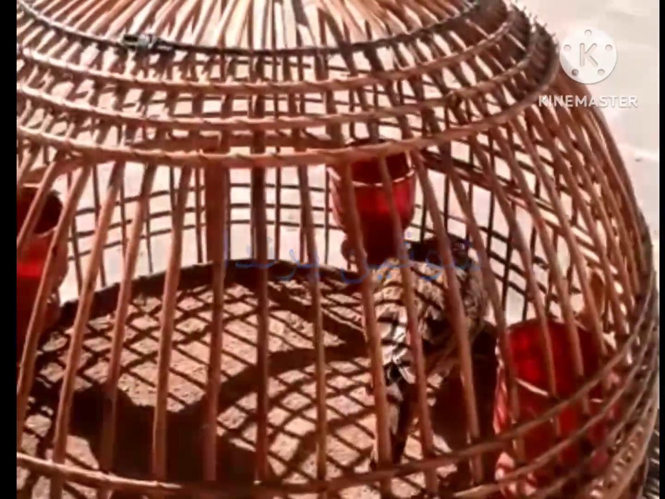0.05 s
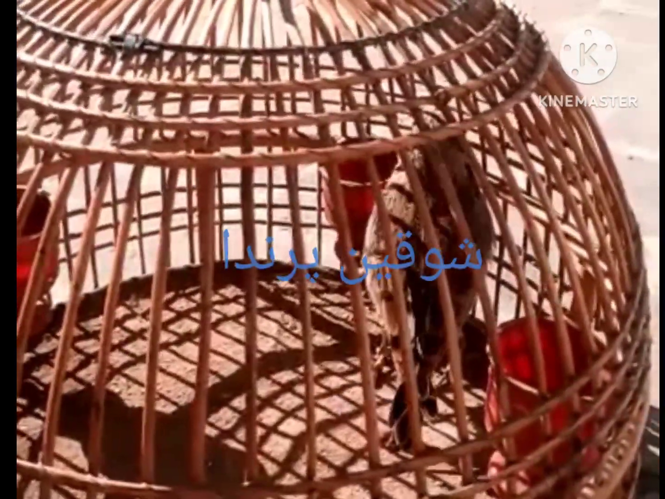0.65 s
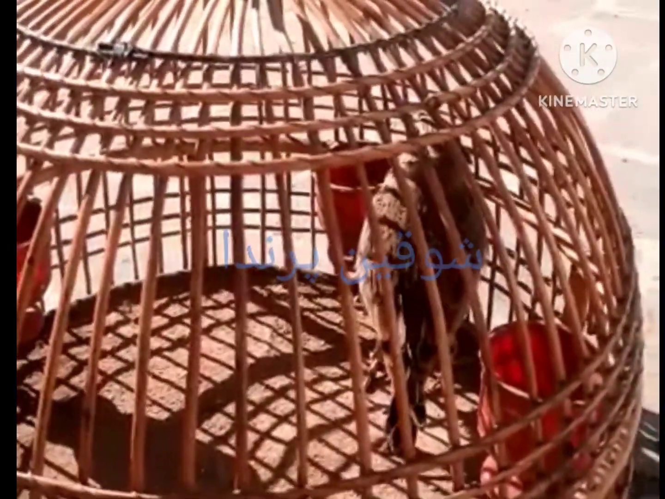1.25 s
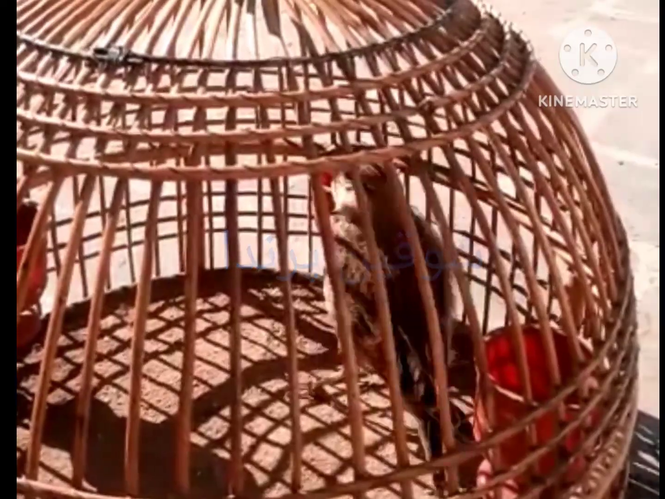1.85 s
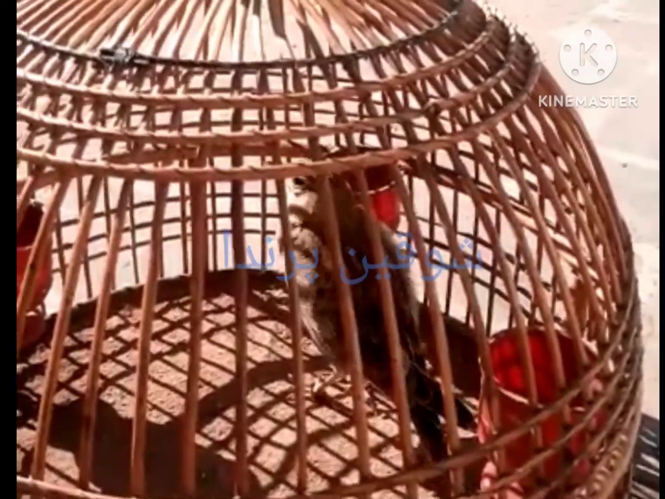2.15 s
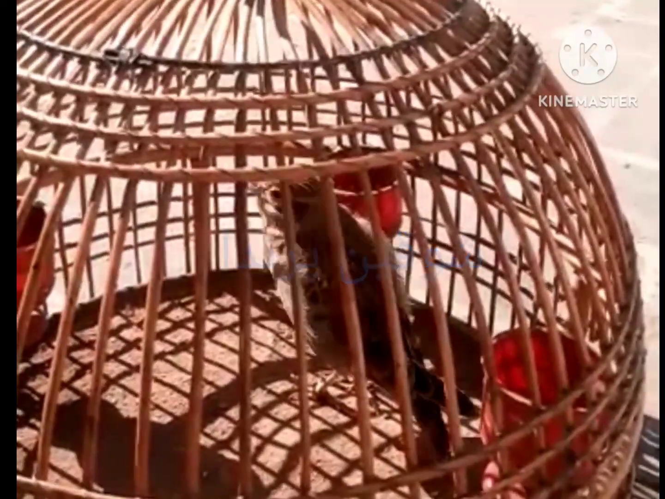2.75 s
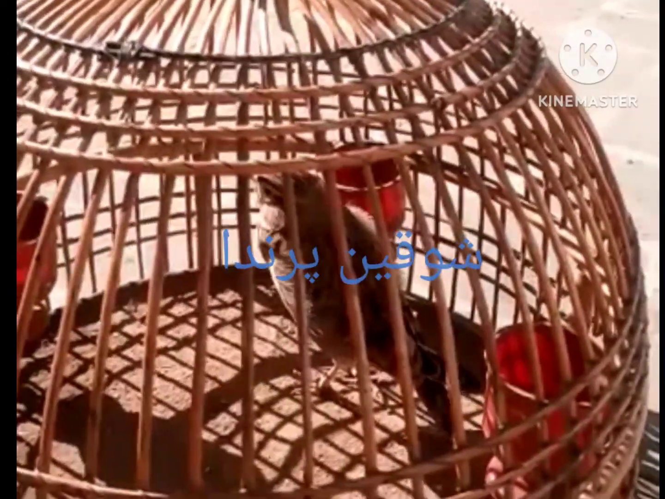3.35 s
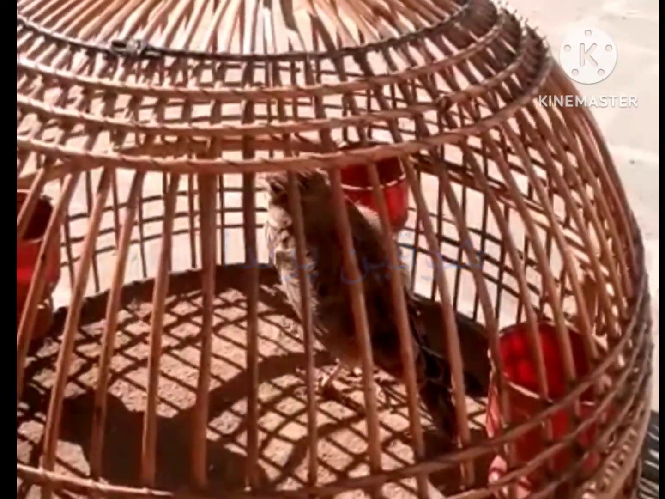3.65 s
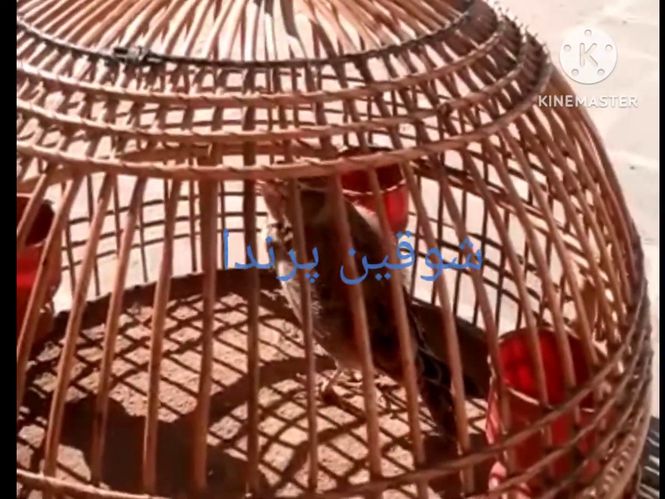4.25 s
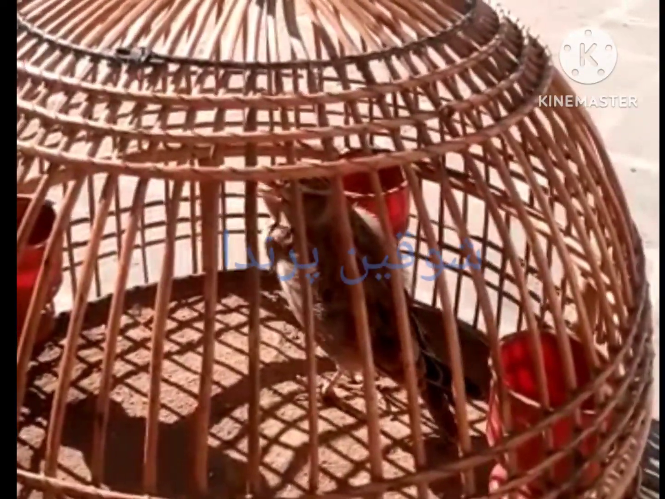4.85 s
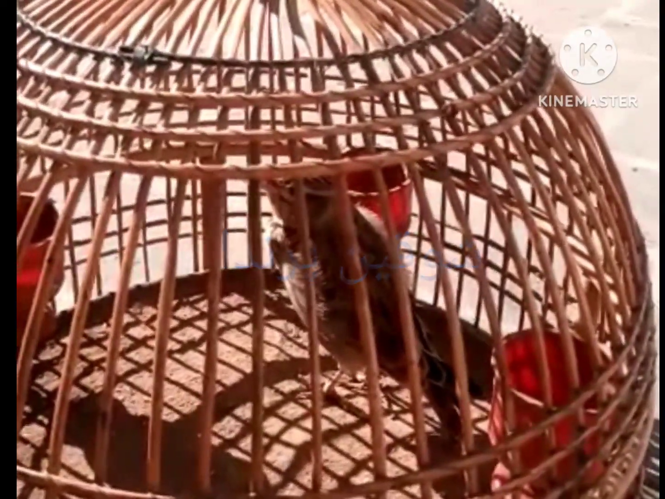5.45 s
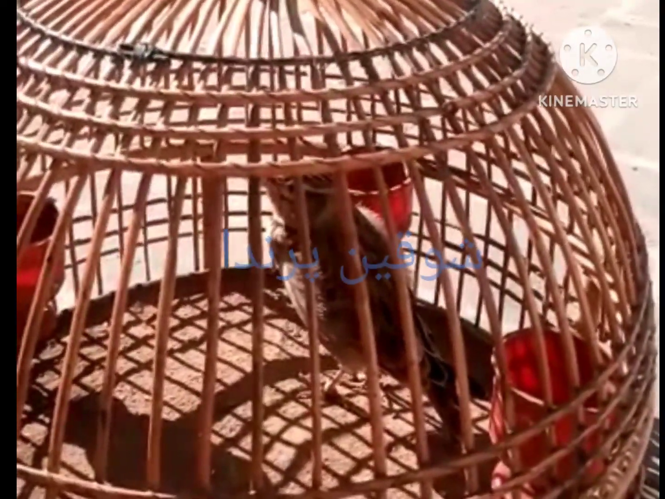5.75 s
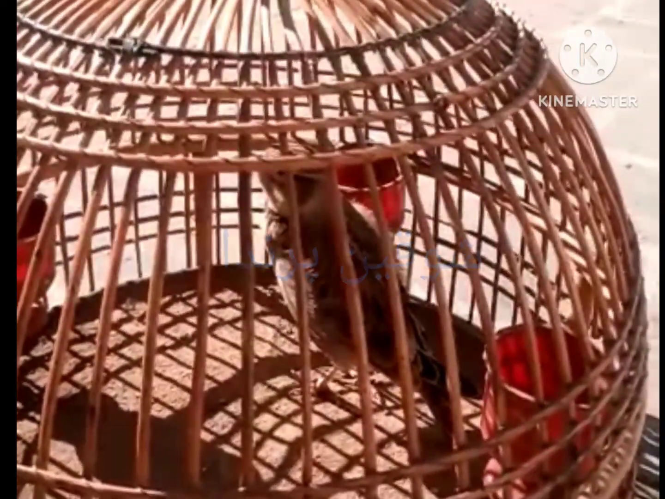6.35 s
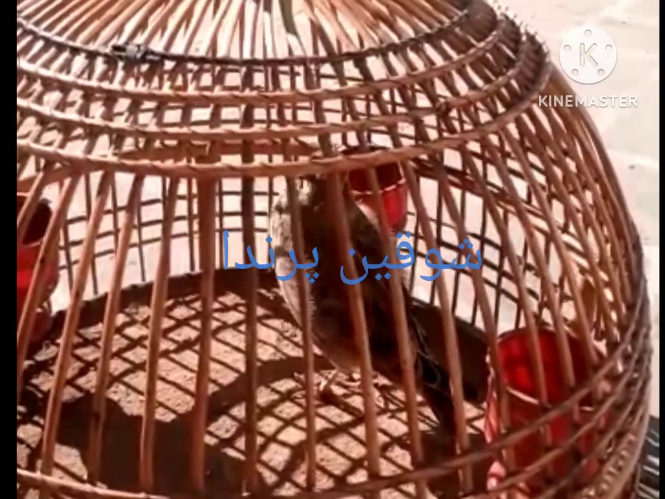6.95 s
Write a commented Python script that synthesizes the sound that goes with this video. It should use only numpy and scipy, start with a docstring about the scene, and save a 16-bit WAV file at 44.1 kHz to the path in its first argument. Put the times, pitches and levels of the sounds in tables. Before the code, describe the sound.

A lark sings close by in a wicker cage, its bright, slightly raspy notes echoing briefly off the hard walls of a yard. A faint town hum lies underneath throughout. At about 0.5 seconds come four high quavering whistles with tiny beak ticks. From 1.4 seconds the bird repeats quick looping slurs that dip and rise, then gives a few plain falling notes at 2.8 and two soft peeps. A fast warble at 3.4 seconds leads into a loud run of about eleven falling notes, from 3.6 to 5 seconds, and three stuttering notes follow. The lark pauses from about 5.4 seconds, and a distant bird calls faintly between 5.7 and 6.7. At around 7 seconds the lark returns with a few short, level whistles.

```python
"""A lark sings in a wicker cage in a hard-walled yard, over a faint town hum. Quavering whistles (0.5 s),
looping slurs (1.4 s), plain falls and two peeps (2.8 s), a warble (3.4 s), falling cascades (3.6 s),
stutters (5.0 s). A far bird calls in the pause (5.7 s); level whistles close (7.0 s).
The syrinx is a gliding near-sine with weak overtones and rasp; floor, cage and walls return every note."""
import sys
import numpy as np
from scipy import signal
from scipy.fft import rfft, irfft, next_fast_len
from scipy.io import wavfile
from scipy.ndimage import uniform_filter1d, map_coordinates

SR = 44100
rng = np.random.default_rng(int(sys.argv[2]) if len(sys.argv) > 2 else 0)


def output_pcm(signal):
    """Save a mono or channel-first signal as 16-bit PCM at the path in sys.argv[1].

    Samples are clipped to [-1, 1] before scaling.
    """
    pcm = np.clip(np.atleast_2d(signal).T, -1, 1) * 32767
    wavfile.write(sys.argv[1], SR, np.round(pcm).astype(np.int16))


N = 317079
TIME_S = np.arange(N) / SR

TOWN_SPECTRUM = [(18, -59.5), (30, -25), (86, 4), (368, -5), (497, -4.5), (550, -3.5), (863, -9.5),
                 (2730, -13), (3600, -19.5), (3980, -14.5), (5520, -18), (12000, -42), (15600, -85),
                 (22000, -120)]  # town noise: f/Hz, relative level/dB
TOWN_HUMS = [(0, 0.43, 281, -53), (2.099, .35, 700, -55.5), (3.306, 0.56, 1225, -61),
             (4.109, 0.37, 670, -63), (6.102, 0.51, 391, -53.5)]  # distant hums: t/s, length/s, f/Hz, level/dB
FAR_BIRD_CALLS = [(5.701, 0.042, 2820, 7500, -47), (5.76, 0.078, 2190, 3190, -53),
                  (6.06, 0.084, 3240, 6080, -43.5), (6.121, 0.055, 2385, 3250, -43.5),
                  (6.13, .25, 5430, 5400, -62.5), (6.34, 0.042, 3580, 4340, -49),
                  (6.49, 0.16, 5390, 5410, -57.5)]  # far slides: t/s, length/s, low f/Hz, high f/Hz, base level/dB
REFLECTIONS = [(.0012, -28), (.0027, -10), (.0053, -10), (0.01, -14), (.0197, -4.5), (.025, -2.55),
               (.0383, -10), (.05, -14.5)]  # floor, cage and wall echoes: delay/s, gain/dB
WALL_RESPONSE = [(2500, 3), (3300, -12), (3900, -6), (4400, 0), (5500, -3.5), (7000, 1), (15000, -29.5)]  # colour of the echoes: f/Hz, gain/dB

THROAT_RESPONSE = [(4000, -13.5), (5500, -28.5), (7000, -35.5), (8500, -40), (10000, -36), (11500, -47),
                   (13000, -59.5), (15200, -27)]  # overtones leaving throat and beak: f/Hz, gain/dB
RASP_SPECTRUM = [(1000, -36.5), (2500, -20), (5500, 3), (7000, -2), (9800, -7), (12000, -26), (14000, 14.5),
                 (15500, -1.5)]  # turbulence in the syrinx: f/Hz, relative level/dB
SYRINX_PRESS = [(.5, 9), (1.15, 5.5), (1.4, -1.5), (2.52, -2.5), (2.63, 8), (2.9, 4), (3.5, -1), (3.7, 6.5),
                (7, 6)]  # pressure lifting overtones and rasp: t/s, gain/dB

# syrinx gestures: share of length/0..1, pitch in range/0..1, gain/dB
FALL_GESTURE = [(0, 0.687, -10), (.13, .93, -3), (.3, .7, 1), (.45, .45, -2), (.65, .18, -16.5),
                (1, 0.032, -13.5)]
RISE_GESTURE = [(0, 0.042, -20.5), (.35, 0.21, -17.5), (.54, .5, -1), (.86, .873, -3), (1, .92, -7.5)]
SLIDE_GESTURE = [(0, 0.94, 0), (.12, .8, -2.5), (.35, .42, 0.5), (1, 0.041, -5)]
FLICK_GESTURE = [(0, 1, 1), (.5, .85, 0), (.78, 0.17, 1.5), (1, 0.04, -12)]
HOLD_GESTURE = [(0, 0.82, 0), (.12, 0.92, 1.5), (.85, .7, -0.5), (1, 0.026, -0.5)]

BEAK_TICKS = [(.715, -36), (.877, -32), (1.093, -37), (6.984, -38)]  # ticks at note onsets: t/s, level/dB
# level whistles: t/s, length/s, low f/Hz, high f/Hz, base level/dB
HELD_NOTES = [(.497, 0.01, 4200, 4820, -36.5), (0.701, 0.009, 4420, 4760, -29),
              (6.986, 0.057, 4110, 4746, -29.5), (7.04, 0.031, 3120, 4765, -23.5),
              (7.071, .082, 3560, 4343, -20), (7.164, .051, 4400, 4765, -18)]
# quavering whistles: t/s, length/s, top f/Hz, dip/Hz, first level/dB, last level/dB
QUAVER_NOTES = [(0.514, 0.12, 4757, 458, -22.5, -17), (.718, .088, 5078, 614, -20, -17),
                (.893, 0.092, 4950, 857, -20.5, -14.5), (1.094, 0.079, 4916, 501, -25.5, -10.5)]
# looping slurs: t/s, length/s, low f/Hz, fall level/dB, rise level/dB
LOOP_NOTES = [(1.377, .09, 2010, -20, -16.5), (1.521, 0.091, 2110, -21, -14.5),
              (1.659, 0.079, 2110, -18, -16), (1.778, 0.07, 1912, -27, -16),
              (1.901, 0.053, 1968, -17, -20.5), (2.011, 0.059, 1830, -24, -18.5),
              (2.123, .066, 2107, -18.5, -14), (2.244, .089, 2366, -17, -12.5),
              (2.389, 0.094, 2180, -15, -11), (2.526, 0.11, 2165, -16.5, -15.5),
              (2.674, .108, 2160, -16.5, -13.5)]
# plain falls, the first in two voices: t/s, high f/Hz, low f/Hz, base level/dB
DROP_NOTES = [(2.845, 2650, 1710, -31), (2.849, 4986, 3350, -38.5), (2.919, 4100, 1720, -21.5),
              (3.006, 4194, 1720, -22), (3.089, 4120, 1720, -24)]
PEEP_NOTES = [(3.184, 0.031), (3.328, 0.058)]  # soft rising peeps: t/s, length/s
CASCADE_NOTES = [(3.628, .054, 4720), (3.72, .063, 5330), (3.836, 0.068, 5500), (3.969, 0.072, 5276),
                 (4.104, .071, 5490), (4.225, 0.076, 5540), (4.353, 0.074, 5690), (4.487, .073, 5570),
                 (4.618, 0.079, 5710), (4.75, 0.082, 5875), (4.885, 0.074, 6090)]  # falling run: t/s, length/s, top f/Hz
STUTTER_NOTES = [(5.017, 0.051, -21), (5.157, 0.043, -21.5), (5.296, .046, -25)]  # slides ending in flicks: t/s, time to first flick/s, base level/dB


def undb(db):
    """Decibels to gain."""
    return 10 ** (np.asarray(db) / 20)


def spectrum_at(points, hz):
    """Gain of an (f/Hz, level/dB) curve at hz."""
    f, db = np.transpose(points)
    return undb(np.interp(np.log(hz + 1), np.log(f), db))


def shaped(x, points):
    """Filter by an (f/Hz, level/dB) curve."""
    size = len(x)
    return irfft(rfft(x) * spectrum_at(points, np.arange(size // 2 + 1) * SR / size), size)


def unit(x):
    """Scale to rms 1."""
    return x / np.sqrt(np.mean(x ** 2))


def coloured(points, count):
    """Noise of a given spectrum, rms 1."""
    return unit(shaped(rng.standard_normal(next_fast_len(count)), points)[:count])


def band(x, lo_hz, hi_hz):
    """Gentle band-pass."""
    sos = signal.butter(2, [lo_hz, min(hi_hz, .45 * SR)], "band", fs=SR, output="sos")
    return signal.sosfilt(sos, x)


def walk(count, rate_hz):
    """Smooth random drift, spread near 1."""
    place = np.arange(count) / SR * rate_hz
    return map_coordinates(rng.standard_normal(4096), [place], order=3, mode="wrap")


def add(track, start_s, sound):
    """Mix a sound in at start_s."""
    i = int(start_s * SR)
    part = sound[:max(N - i, 0)]
    track[i:i + len(part)] += part


def town(mid_band_db=-49.5, waver_db=1.84):
    """Distant hum and hiss; narrow hums come and go."""
    noise = coloured(TOWN_SPECTRUM, N)
    out = noise / np.std(band(noise, 100, 1000)) * undb(mid_band_db + waver_db * walk(N, 7.2))
    for start_s, length_s, hz, db in TOWN_HUMS:
        count = int(length_s * SR)
        hum = unit(band(rng.standard_normal(count), hz - 20, hz + 20))
        add(out, start_s, hum * signal.windows.tukey(count, .5) * undb(db))
    return out


def far_bird():
    """Faint slides and near-level notes from a second syrinx."""
    return notes(SLIDE_GESTURE, FAR_BIRD_CALLS, wander=.0038, rough=.007,
                 slope_db=-6, rasp_db=-25, flutter_db=1.5)


def yard(x, scatter_db=-12, scatter_t60_s=.24, tail_db=-16, tail_t60_s=.54, wall_delay_s=.023):
    """Quick scatter off wicker and ground, then a diffuse tail from the walls."""
    t = TIME_S[:SR]
    scatter = rng.standard_normal(SR) * undb(-60 * t / scatter_t60_s)
    tail = rng.standard_normal(SR) * undb(-60 * t / tail_t60_s) * (t > wall_delay_s)
    response = undb(scatter_db) * unit(scatter) + undb(tail_db) * unit(band(tail, 300, 8000))
    return signal.fftconvolve(x, response / np.sqrt(SR))[:N]


def echoes(x, blur_s=.001, blur_db=-3, ring_hz=3900, ring_t60_s=.19, ring_db=-13):
    """Single reflections smeared by uneven surfaces, plus a short ring between the cage bars."""
    bounces = np.zeros(SR // 4)
    for delay_s, db in REFLECTIONS:
        smear = rng.standard_normal(256) * np.exp(-TIME_S[:256] / blur_s)
        bounce = undb(blur_db) * smear / np.linalg.norm(smear)
        bounce[0] += .75  # specular part
        add(bounces, delay_s, undb(db) * bounce)
    t = TIME_S[:SR // 8]
    fade = undb(-60 * t / ring_t60_s)
    ring = 2 * fade / fade.sum() * np.sin(2 * np.pi * ring_hz * t)
    response = shaped(bounces, WALL_RESPONSE)[:len(t)] + undb(ring_db) * ring
    return signal.fftconvolve(x, response)[:N]


def ticks(decay_s=.0023):
    """Tiny beak ticks: decaying noise bursts."""
    out, t = np.zeros(N), TIME_S[:512]
    for start_s, db in BEAK_TICKS:
        burst = unit(band(rng.standard_normal(len(t)), 2950, 3340))
        add(out, start_s, undb(db) * burst * np.exp(-t / decay_s))
    return out


def syrinx(start_s, hz, db, rough, slope_db, rasp_db, half_db=-55, flutter_db=3,
           full_effort_db=-12, tension_db_per_oct=7, edge_s=.0015):
    """One unsteady sine. Overtones and rasp grow with effort; alternating cycles add half harmonics."""
    count = len(hz)
    t = TIME_S[:count]
    hz = hz * (1 + rough * walk(count, 1114))
    phase = 2 * np.pi * np.cumsum(hz) / SR
    tone = np.sin(phase) + undb(half_db) * (np.sin(phase / 2) + np.sin(1.5 * phase))
    rasp = band(coloured(RASP_SPECTRUM, count), hz.min(), 2.33 * hz.mean())
    upper = undb(rasp_db + 2 * walk(count, 260)) * rasp
    for k in range(2, 6):
        gain = spectrum_at(THROAT_RESPONSE, k * hz) * undb(slope_db * (k - 2.5) + 2.2 * walk(count, 710))
        upper += gain * (k * hz < SR / 2) * np.sin(k * phase)
    press_db = np.interp(start_s + t, *np.transpose(SYRINX_PRESS)) + .25 * (np.max(db) - full_effort_db)
    press_db += tension_db_per_oct * np.log2(hz / 4500)  # tauter membranes, brighter tone
    gate = np.sin(np.pi / 2 * np.clip(np.minimum(t, t[-1] - t) / edge_s, 0, 1)) ** 2
    envelope = gate * undb(db + flutter_db * walk(count, 255.3))
    out = np.zeros(N)
    add(out, start_s, (tone + upper * undb(press_db)) * envelope)
    return out


def notes(gesture, rows, wander, **voice):
    """One gesture, stretched to each row's length and range, with random pitch drift."""
    out = np.zeros(N)
    share, height, effort_db = np.transpose(gesture)
    for start_s, length_s, low_hz, high_hz, db in rows:
        u = np.linspace(0, 1, int(length_s * SR))
        hz = low_hz + (high_hz - low_hz) * np.interp(u, share, height)
        hz = uniform_filter1d(hz, size=90, mode="nearest") * (1 + wander * walk(len(u), 157.1))
        out += syrinx(start_s, hz, db + np.interp(u, share, effort_db), **voice)
    return out


def level_whistles():
    """Near-steady notes that drop at the end."""
    return notes(HOLD_GESTURE, HELD_NOTES, wander=.0056, rough=.0039,
                 slope_db=-6, rasp_db=-34, half_db=-44)


def quavers(rate_hz=35, first_dip_s=.018, dip_db=-5, break_db=-10, release_s=.018, release_db=-6):
    """High whistles in quick beats: hold, flick down, break briefly, restart."""
    out = np.zeros(N)
    for start_s, length_s, top_hz, dip_hz, first_db, last_db in QUAVER_NOTES:
        t = TIME_S[:int(length_s * SR)]
        beat = (rate_hz * (t - first_dip_s)) % 1
        sag = uniform_filter1d(beat ** 3.02, size=60)
        gap = uniform_filter1d(1. * (beat < .2), size=120)
        db = np.linspace(first_db, last_db, len(t)) + dip_db * sag + break_db * gap
        db += release_db * np.clip(1 - (length_s - t) / release_s, 0, 1)
        hz = top_hz - dip_hz * sag
        out += syrinx(start_s, hz, db, rough=.0083, slope_db=-9, rasp_db=-35.5, half_db=-39.5)
    return out


def warble(start_s=3.421, length_s=.2, crest_s=3.502, rate_hz=60, centre_hz=3370,
           base_db=-17, ends_db=-8, throb_db=2.5):
    """Fast, uneven vibrato; swells and fades while it widens and turns to rasp."""
    u = np.linspace(0, 1, int(length_s * SR))
    t = start_s + u * length_s
    beat = np.cos(2 * np.pi * (rate_hz * (t - crest_s) + .071 * walk(len(u), 58.3)))
    swing_hz = np.linspace(170, 560, len(u))
    rasp_db = np.linspace(-41, -9.5, len(u))
    db = base_db + ends_db * (2 * u - 1) ** 2 + throb_db * beat
    return syrinx(start_s, centre_hz + swing_hz * beat, db, rough=.017, slope_db=-1.5, rasp_db=rasp_db)


def loops(rise_s=.034, rest_s=.00495, span_ratio=1.92, ceiling_hz=3940, drop_s=.068,
          peep_range_hz=(2930, 4440), peep_db=-42.5):
    """U-shaped slurs, each a fall and a rise of constant length; then plain falls and two peeps."""
    falls, rises = [], []
    for start_s, length_s, low_hz, fall_db, rise_db in LOOP_NOTES:
        high_hz = min(span_ratio * low_hz, ceiling_hz)
        falls.append((start_s, length_s - rise_s - rest_s, low_hz, high_hz, fall_db))
        rises.append((start_s + length_s - rise_s, rise_s, low_hz, high_hz, rise_db))
    falls += [(start_s, drop_s, low_hz, high_hz, db) for start_s, high_hz, low_hz, db in DROP_NOTES]
    rises += [(start_s, length_s, *peep_range_hz, peep_db) for start_s, length_s in PEEP_NOTES]
    return (notes(FALL_GESTURE, falls, wander=.027, rough=.022, slope_db=-8, rasp_db=-26.5, flutter_db=4)
            + notes(RISE_GESTURE, rises, wander=.0413, rough=.031, slope_db=-11.5, rasp_db=-28))


def stutters(slide_range_hz=(4640, 5976), flick_range_hz=(2810, 4682), flick_s=.011,
             overlap_s=.0123, flick_lift_db=.5):
    """High slides, each breaking into three even downward flicks."""
    slides, flicks = [], []
    for start_s, lead_s, db in STUTTER_NOTES:
        slides.append((start_s, lead_s + overlap_s, *slide_range_hz, db))
        for k in range(3):
            flicks.append((start_s + lead_s + k * flick_s, flick_s, *flick_range_hz, db + flick_lift_db))
    return (notes(SLIDE_GESTURE, slides, wander=.028, rough=.031, slope_db=-6, rasp_db=-32)
            + notes(FLICK_GESTURE, flicks, wander=.013, rough=.039, slope_db=-2, rasp_db=-23))


def cascades(hook_hz=197.4, knee_hz=3837, end_hz=2563, hook_share=.08, swell_share=.406, snap_share=.13,
             base_db=-13.5, dip_db=-15, crescendo_db=6, snap_db=-5):
    """Each note hooks up, eases down to a knee in ever louder swells, then snaps down and fades."""
    out = np.zeros(N)
    for start_s, length_s, top_hz in CASCADE_NOTES:
        u = np.linspace(0, 1, int(length_s * SR))
        hook = np.clip(1 - u / hook_share, 0, 1)
        glide = np.interp(u, [hook_share, 1 - snap_share], [1, 0]) ** 1.35
        snap = np.clip(1 - (1 - u) / snap_share, 0, 1)
        hz = knee_hz + (top_hz - knee_hz) * glide - hook_hz * hook - (knee_hz - end_hz) * snap
        hz *= 1 + .0195 * walk(len(u), 165.7)
        dip = (1 - np.abs(np.sin(np.pi * (1 - u) / swell_share))) ** 2
        db = base_db + dip_db * dip - crescendo_db * (1 - u) + snap_db * snap
        out += syrinx(start_s, hz, db, rough=.022, slope_db=-4.5, rasp_db=-32.5,
                      half_db=-47, flutter_db=1.3)
    return out


def scene(whistle_send_db=-1, slur_send_db=-3.5, run_send_db=1, far_direct_db=-5, far_send_db=10):
    """Near lark, far bird, reflections and town; mono."""
    slurs = loops()
    run = cascades() + stutters()
    whistles = quavers() + warble() + level_whistles() + ticks()
    far = far_bird()
    # the bird turns between phrases, so each throws its own share at the walls
    thrown = undb(whistle_send_db) * whistles + undb(slur_send_db) * slurs + undb(run_send_db) * run
    space = echoes(thrown) + yard(thrown + undb(far_send_db) * far)
    return (whistles + slurs + run + undb(far_direct_db) * far + space + town())[None]


def record(dry, cutoff_hz=15800):
    """Steep low-pass on the top treble."""
    return signal.sosfilt(signal.ellip(10, .2, 70, cutoff_hz, fs=SR, output="sos"), dry)


dry = scene()
out = record(dry)
output_pcm(out)
```